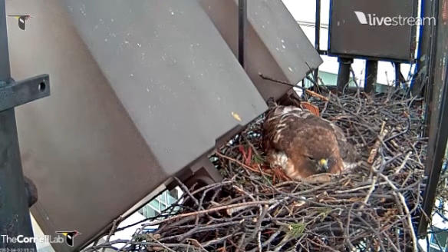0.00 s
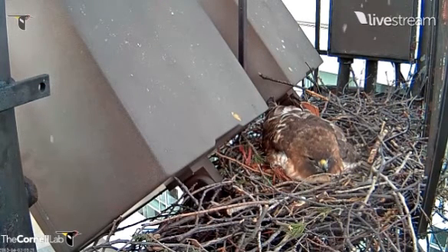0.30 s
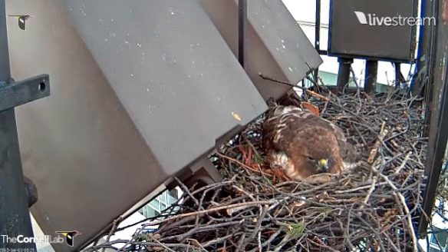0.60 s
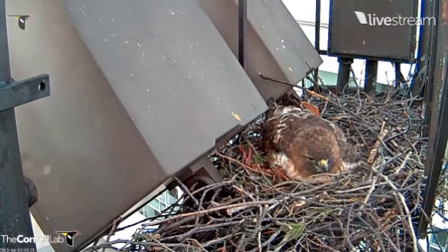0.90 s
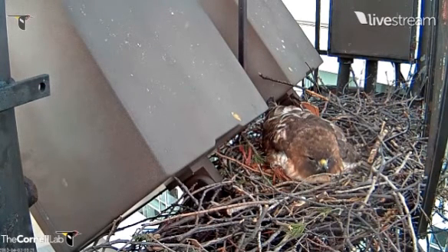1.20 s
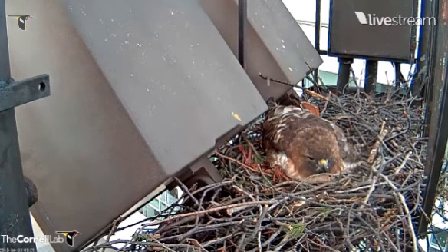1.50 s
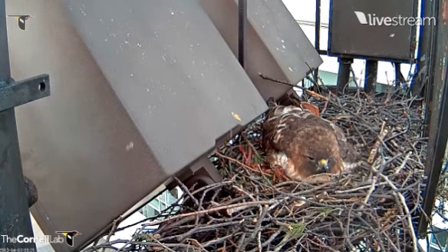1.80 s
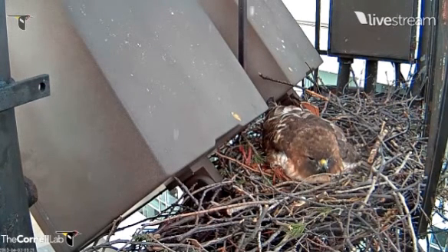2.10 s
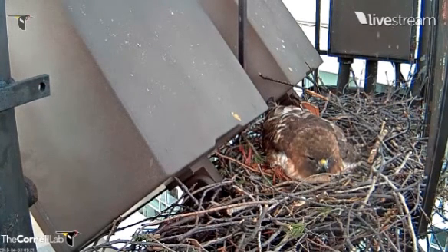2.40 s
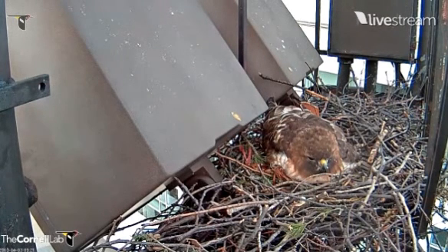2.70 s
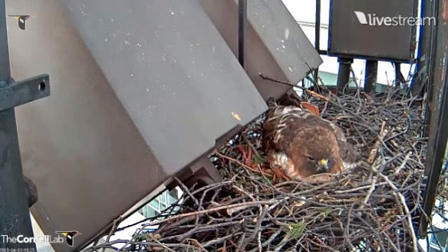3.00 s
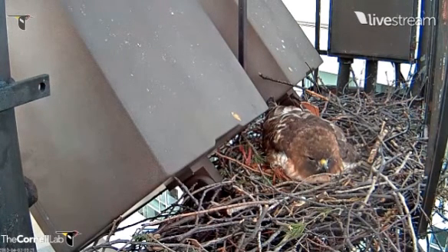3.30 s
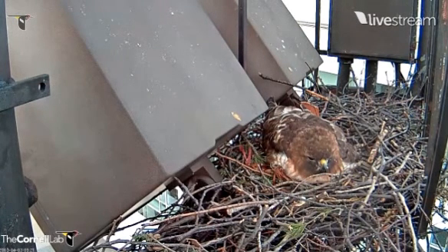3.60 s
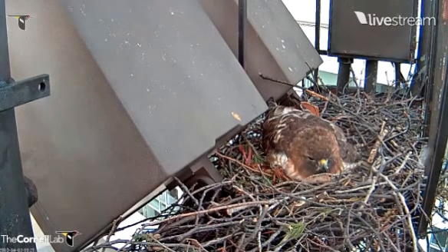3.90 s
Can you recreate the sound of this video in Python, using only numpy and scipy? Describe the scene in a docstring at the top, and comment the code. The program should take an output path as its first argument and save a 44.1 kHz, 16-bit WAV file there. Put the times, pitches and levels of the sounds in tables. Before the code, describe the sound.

A bird gives sharp chips and five short, raspy whistling calls over faint hum and hiss.

```python
"""A sharp two-voiced chip cuts through distant hum and steady hiss: a bird by a hawk's nest on a mast.
Five calls follow, building in strength and pitch, with a second chip after the third. In each call
a thin arched whistle (missing from the first) breaks into a rasp an octave down, and the voice
slackens into a closing creak. The mast scatters the sound and a far wall gives a faint echo."""
import sys
import numpy as np
from scipy import signal
from scipy.fft import rfft, irfft
from scipy.io import wavfile

SR = 44100
rng = np.random.default_rng(int(sys.argv[2]) if len(sys.argv) > 2 else 0)


def dump_mix(stems):
    """Bounce the given channels to the path in sys.argv[1] as a 16-bit WAV at rate SR."""
    frames = np.atleast_2d(stems).T  # one column per channel
    limited = np.clip(frames, -1, 1)  # hard clip at full scale
    pcm = np.round(limited * 32767).astype(np.int16)
    wavfile.write(sys.argv[1], SR, pcm)


N = 176400
T = np.arange(N) / SR

# whistles: (start [s], rise time [s], length [s], top pitch [Hz], level [dB],
# push before the break [dB], flutter depth [0-1])
WHISTLE_CUES = [(1.368, 0.033, .073, 3930, -45.5, -3, 0), (2.046, 0.053, 0.092, 4040, -44, 2, 0.01),
                (2.709, .060, .086, 4312, -41.5, 7, 0.42), (3.346, 0.061, .085, 4223, -41, 4.5, 0)]
WHISTLE_START_HZ, WHISTLE_FALL_HZ, WHISTLE_FADE_S = 3780, 412, 0.0092
WHISTLE_SWELL_DB, WHISTLE_OCTAVE_DB, WHISTLE_BREATH_DB = 10, -39, -27.5
FLUTTER_HZ, FLUTTER_S = 380, 0.022
PUSH_S, BREAK_S, BREAK_HZ_PER_S = 0.007, 0.0054, 150000

# rasps: (start [s], length [s], top pitch [Hz], crest position [0-1], undertone delay [s],
# then the layer faders: fundamental [dB], octave [dB], undertones [dB], breath [dB])
RASP_CUES = [(0.791, 0.061, 1661, 0.94, 0.009, -56, -56, -79, -60),
             (1.459, 0.0807, 1822, 0.5, 0.041, -50, -56.5, -50, -52.5),
             (2.15, 0.088, 1915, 0.44, .013, -43, -47, -44, -46),
             (2.802, .094, 2000, .5, 0.034, -41, -41.5, -36.5, -41),
             (3.437, 0.11, 2006, 0.55, 0.024, -42, -43.5, -33, -40)]
# growl of the split voice: (multiple of a quarter of the pitch [1], level [dB])
UNDERTONE_PARTIALS = [(2, -31.5), (5, 0.5), (6, -15.5), (7, -12.5), (9, -36), (10, -24.5)]
# bright edge of the rasp: (harmonic [number], level against the octave [dB])
RASP_PARTIALS = [(3, -21), (4, -34), (6, -52)]
# breath colour of rasps and creaks: (frequency [Hz], relative level [dB])
THROAT_EQ = [(800, -23.5), (1600, -13.5), (2150, 2), (2900, 5), (3250, -3.5), (3800, -5.5), (4300, -21.5),
             (5200, -14.5), (8500, -43), (14000, -58)]
ARCH_RISE, ARCH_FALL = 0.05, 0.075   # share of the pitch lost at either end
RASP_ATTACK_S, RASP_RELEASE_S, UNDERTONE_RISE_S, BREATH_LEAD_S = 0.0048, 0.012, 0.0079, 0.011
SPLIT_HZ, SPLIT_WIDTH_HZ, SPLIT_LOSS_DB = 1955, 17, 14   # above this pitch the fundamental gives way

# creaks: (centre time [s], pitch [Hz], level before the trim [dB])
CREAK_CUES = [(.869, 808, -47), (1.543, 930, -42.5), (2.241, 962.4, -39.5), (2.9, 970.4, -39),
              (3.550, 963, -40.5)]
# creak timbre: (harmonic [number], level [dB])
CREAK_TIMBRE = [(1, -15), (2, -10.5), (3, 0.5), (4, -12)]
CREAK_WIDTH_S, CREAK_SAG_PER_S, CREAK_BREATH_DB, CREAK_TRIM_DB = 0.0059, 5, -1.5, -3.5

# lower voice, one curve a chip: (time [s], pitch [Hz], second harmonic [dB], bite [dB])
CHIP_CURVES = [
    [(.356, 1375, -46, -45), (.362, 1398, -31.5, -35), (.371, 1415, -45, -42), (.380, 1347, -44, -36),
     (.392, 1330, -55, -51), (.404, 1375, -56, -54), (.410, 1400, -61, -62)],
    [(2.477, 1350, -52, -54), (2.483, 1379, -47, -38), (2.489, 1370, -41, -30.5), (2.498, 1325, -49, -46),
     (2.508, 1410, -51, -53), (2.515, 1381, -54, -37.5), (2.536, 1380, -58, -63)],
]
# the chip's bite, led by the third harmonic: (harmonic [number], relative level [dB])
BITE_PARTIALS = [(1, -24.5), (3, -0.5), (4, -21), (5, -29)]
# upper voice, one sweep a chip: (start [s], length [s], level before the envelope [dB])
SWEEP_CUES = [(0.349, .07, -42.5), (2.473, 0.069, -49)]
# the sweep's climb: (position [0-1], pitch [Hz])
SWEEP_PITCH = [(0, 4400), (.15, 5300), (.35, 4840), (.55, 5340), (.7, 6860), (1, 7350)]
# the sweep's envelope: (position [0-1], level [dB])
SWEEP_ENVELOPE = [(0, -8), (.17, -2.5), (.42, -4.5), (.62, -10.5), (.78, -20), (1, -29)]
# airy colour of chips and whistles: (frequency [Hz], relative level [dB])
AIR_EQ = [(1200, -36), (2800, 0), (3500, 3.5), (4500, 10), (5700, -1), (7300, -10.5), (8300, -23),
          (14000, -39.5)]
SWEEP_BEAT, CHIP_AIR_DB, RATTLE_DB, RATTLE_HZ = 0.97, 2.5, 3, 200

# distant hum: (frequency [Hz], relative level [dB])
HUM_EQ = [(30, -15.5), (110, -26.5), (160, -23.5), (200, -10.5), (260, -6), (325, 1), (460, -2), (630, -7),
          (720, -11.5), (900, -9.5), (1500, -12.5), (2500, -25), (4000, -88)]
# steady hiss: (frequency [Hz], relative level [dB])
HISS_EQ = [(1200, -53.5), (1900, -11.5), (2350, 0.5), (2700, 1), (3200, -5.5), (3950, -6), (4400, -22.5),
           (6500, -19.5), (7800, -23.5), (8300, -63), (14000, -76)]
HUM_DB, HISS_DB, HISS_WAVER_DB = -59.5, -56.5, 1
SCATTER_T60_S, SCATTER_DB, ECHO_S, ECHO_SMEAR_S, ECHO_DB = 0.11, -15, 0.082, 0.019, -28.5

# the recorder's noise floor: (frequency [Hz], relative level [dB])
FLOOR_EQ = [(200, 17), (2000, -25), (5000, 11.5), (14000, 4)]
# the recorder's steady offset: (left [full scale], right [full scale])
DC_OFFSET = [.019, .0094]
FLOOR_DB, CUTOFF_HZ = -75.5, 14300


def from_db(db):
    """Decibels to gain."""
    return 10 ** (np.asarray(db) / 20)


def rms_one(x):
    """Scale to rms 1."""
    return x / np.sqrt(np.mean(x ** 2) + 1e-20)


def along(points, at):
    """Read a breakpoint curve by straight lines."""
    return np.interp(at, *np.transpose(points))


def noise(eq):
    """Noise coloured by an EQ curve, rms 1."""
    hz, db = np.transpose(eq)
    bins = np.maximum(np.fft.rfftfreq(N, 1 / SR), 1)
    gain = from_db(np.interp(np.log(bins), np.log(hz), db))
    return rms_one(irfft(rfft(rng.standard_normal(N)) * gain, N))


def drift(rate_hz):
    """Smooth random modulator, rms 1."""
    pole = np.exp(-2 * np.pi * rate_hz / SR)
    return rms_one(signal.lfilter([1], [1, -2 * pole, pole * pole], rng.standard_normal(N + SR))[SR:])


def phase_of(hz, jitter, rate_hz):
    """Running phase of a pitch curve that wobbles at random by the share `jitter`."""
    return 2 * np.pi * np.cumsum(hz * (1 + jitter * drift(rate_hz))) / SR


def tone(phase):
    """Sine of rms 1."""
    return np.sqrt(2) * np.sin(phase)


def stack(phase, partials, shimmer_db):
    """Harmonics of a phase, each trembling in level and timing on its own."""
    mix = 0
    for harmonic, db in partials:
        gain = from_db(db + shimmer_db * drift(120))
        shift = rng.uniform(0, 2 * np.pi) + 0.086 * shimmer_db * drift(160)
        mix += gain * tone(harmonic * phase + shift)
    return mix


def gate(start, end, fade):
    """1 between start and end, with straight fades outside."""
    return np.clip(np.minimum(T - start, end - T) / fade + 1, 0, 1)


def nearest(cues, centres):
    """For every moment, the columns of the closest cue."""
    centres = np.asarray(centres)
    return np.array(cues)[np.searchsorted((centres[1:] + centres[:-1]) / 2, T)].T


def rasps():
    """The body of the call: an arched tone splits into quarter-pitch undertones and pulsing breath."""
    cues = nearest(RASP_CUES, [cue[0] + cue[1] / 2 for cue in RASP_CUES])
    start, length, top_hz, crest, delay, low_db, octave_db, under_db, breath_db = cues
    position = np.clip((T - start) / length, 0, 1)
    before_crest = np.maximum(1 - position / crest, 0)
    after_crest = np.maximum((position - crest) / (1 - crest), 0)
    pitch = top_hz * (1 - ARCH_RISE * before_crest ** 3 - ARCH_FALL * after_crest ** 3)
    phase = phase_of(pitch, jitter=0.0044, rate_hz=200)
    attack = np.clip((T - start) / RASP_ATTACK_S + 0.13, 0, 1)
    release = np.clip((start + length - T) / RASP_RELEASE_S + 0.5, 0, 1)
    effort = np.sin(np.pi * position ** 1.14) + 1e-6
    rough = np.clip((T - start - delay) / UNDERTONE_RISE_S + 0.5, 0, 1)
    split = (1 + np.tanh((pitch - SPLIT_HZ) / SPLIT_WIDTH_HZ)) / 2
    low = from_db(low_db - SPLIT_LOSS_DB * split + 3.2 * (position - 1)) * tone(phase)
    overtones = stack(phase, [(2, 0.009)] + RASP_PARTIALS, shimmer_db=2)
    high = from_db(octave_db) * (2 + rough) / 3 * effort ** 0.24 * overtones
    undertones = stack(phase / 4, UNDERTONE_PARTIALS, shimmer_db=0.5)
    growl = from_db(under_db) * rough * effort ** 0.8 * undertones
    pulsing = 1 + 0.13 * rough * np.sin(phase / 4)
    breath = from_db(breath_db) * (1 + rough * effort) / 2 * pulsing * noise(THROAT_EQ)
    airflow = gate(start, start + length, BREATH_LEAD_S)   # air escapes before the tone
    return attack * release * (low + high + growl) + airflow * breath


def whistles():
    """Nearly pure arched tones that swell, may flutter at the top, then plunge as the voice breaks."""
    cues = nearest(WHISTLE_CUES, [cue[0] + cue[1] for cue in WHISTLE_CUES])
    start, rise, length, top_hz, db, push_db, flutter_depth = cues
    age = np.clip(T - start, 0, length)
    break_age = np.clip(T - start - length, 0, BREAK_S)
    scoop = (top_hz - WHISTLE_START_HZ) * np.maximum(1 - age / rise, 0) ** 1.3
    fall = WHISTLE_FALL_HZ * np.maximum((age - rise) / (length - rise), 0) ** 2.6
    phase = phase_of(top_hz - scoop - fall - BREAK_HZ_PER_S * break_age, jitter=0.0036, rate_hz=220)
    breath = from_db(WHISTLE_BREATH_DB) * noise(AIR_EQ)
    voice = tone(phase) + from_db(WHISTLE_OCTAVE_DB) * tone(2 * phase) + breath
    tremolo = (1 + np.sin(phase_of(FLUTTER_HZ, jitter=0.218, rate_hz=90))) / 2
    flutter = 1 - flutter_depth * np.exp(-((age - rise) / FLUTTER_S) ** 2) * tremolo
    swell = WHISTLE_SWELL_DB * (np.sin(1.65 * age / length) - 0.8)
    push = push_db * np.exp(-((length - age) / PUSH_S - 0.5) ** 2)
    fade = np.clip((T - start) / WHISTLE_FADE_S + 0.3, 0, 1) * (1 - break_age / BREAK_S) ** 2
    return voice * flutter * fade * from_db(db + swell + push + 0.6 * drift(40))


def creaks():
    """The slackening voice drops another octave and ends in one short, gritty burst."""
    centre, hz, db = nearest(CREAK_CUES, [cue[0] for cue in CREAK_CUES])
    age = np.clip(T - centre, -0.05, 0.05)
    phase = phase_of(hz * (1 - CREAK_SAG_PER_S * age), jitter=0.0187, rate_hz=300)
    voice = stack(phase, CREAK_TIMBRE, shimmer_db=3) + from_db(CREAK_BREATH_DB) * noise(THROAT_EQ)
    return from_db(db + CREAK_TRIM_DB) * np.exp(-(age / CREAK_WIDTH_S) ** 2 / 2) * voice


def chips():
    """Two voices at once: a harmonic note, and a rough rising sweep that beats with it; both rattle."""
    mix, air = 0, noise(AIR_EQ)
    for curve, (start, length, sweep_db) in zip(CHIP_CURVES, SWEEP_CUES):
        times, hz, body_db, bite_db = np.transpose(curve)
        phase = phase_of(np.interp(T, times, hz), jitter=0.009, rate_hz=360)
        body = from_db(np.interp(T, times, body_db)) * tone(2 * phase)
        bite = from_db(np.interp(T, times, bite_db)) * stack(phase, BITE_PARTIALS, shimmer_db=1.1)
        mix += gate(times[0], times[-1], fade=0.0027) * (body + bite)
        position = (T - start) / length
        force = from_db(along(SWEEP_ENVELOPE, position))
        sweep = tone(phase_of(along(SWEEP_PITCH, position), jitter=0.042 * np.sqrt(force), rate_hz=320))
        beat = 1 + SWEEP_BEAT * force * np.sin(phase / 2)   # at half the lower voice's pitch
        breath = from_db(CHIP_AIR_DB) * force ** 0.31 * air
        mix += from_db(sweep_db) * force * gate(start, start + length, fade=0.0026) * (sweep * beat + breath)
    return mix * from_db(RATTLE_DB * drift(RATTLE_HZ))


def reflections(bird):
    """Add a short scatter from the mast and one smeared echo from a far wall."""
    t = T[:SR // 2]
    scatter = rms_one(rng.standard_normal(len(t)) * from_db(-60 * t / SCATTER_T60_S))
    echo = rms_one(rng.standard_normal(len(t)) * np.exp(-np.abs(t - ECHO_S) / ECHO_SMEAR_S))
    response = (from_db(SCATTER_DB) * scatter + from_db(ECHO_DB) * echo) / np.sqrt(len(t))
    return bird + signal.fftconvolve(bird, response)[:N]


def hum_and_hiss():
    """The outdoor bed: a distant low hum under a hiss that barely wavers."""
    hum = from_db(HUM_DB) * noise(HUM_EQ)
    hiss = from_db(HISS_DB + HISS_WAVER_DB * drift(6)) * noise(HISS_EQ)
    return hum + hiss


def scene():
    """Bird, reflections and bed reach one microphone, alike on both channels."""
    mono = reflections(whistles() + rasps() + creaks() + chips()) + hum_and_hiss()
    return np.array([mono, mono])


def record(dry):
    """Each channel adds its own faint noise and a steady offset; a steep low-pass cuts the top."""
    floor = from_db(FLOOR_DB) * np.array([noise(FLOOR_EQ), noise(FLOOR_EQ)])
    lowpass = signal.ellip(10, 0.1, 70, CUTOFF_HZ, fs=SR, output="sos")
    return signal.sosfilt(lowpass, dry + floor) + np.array(DC_OFFSET)[:, None]


dry = scene()
out = record(dry)
dump_mix(out)
```